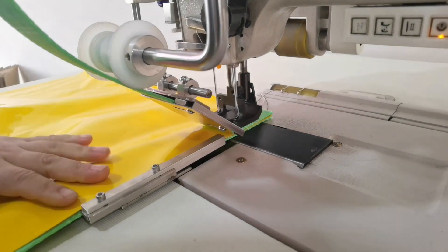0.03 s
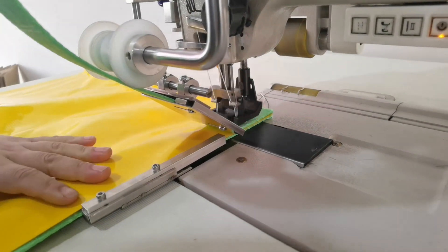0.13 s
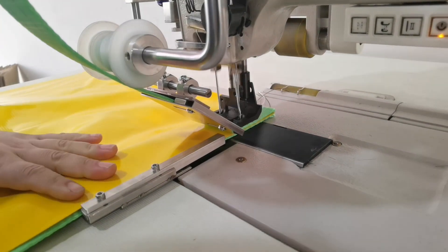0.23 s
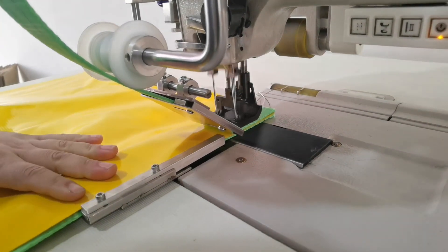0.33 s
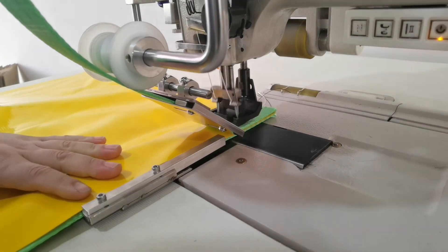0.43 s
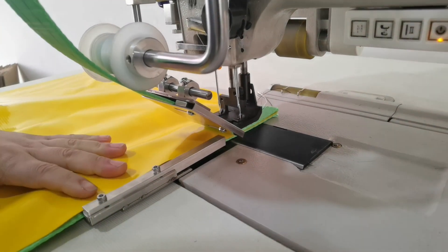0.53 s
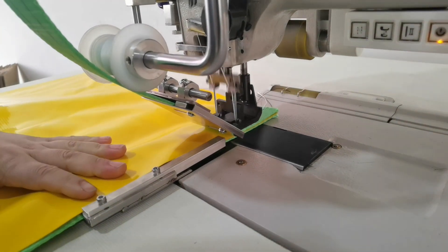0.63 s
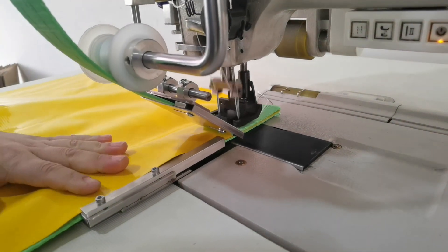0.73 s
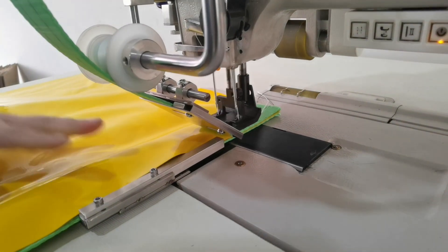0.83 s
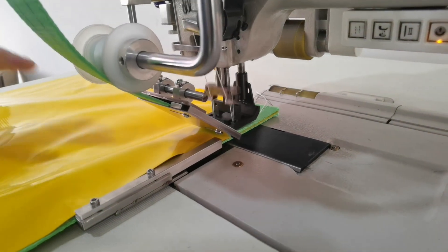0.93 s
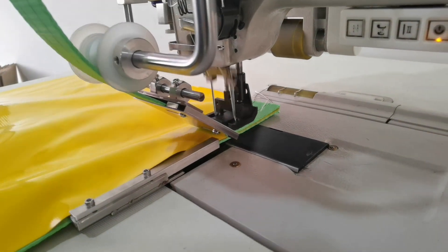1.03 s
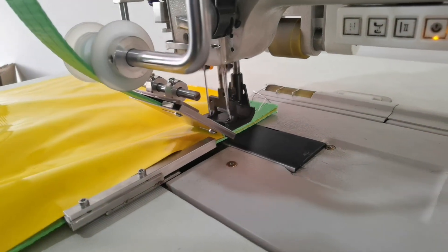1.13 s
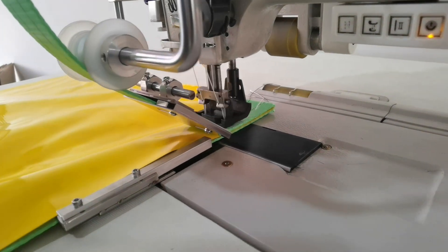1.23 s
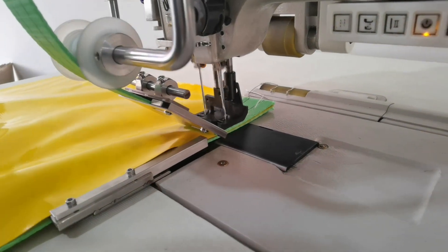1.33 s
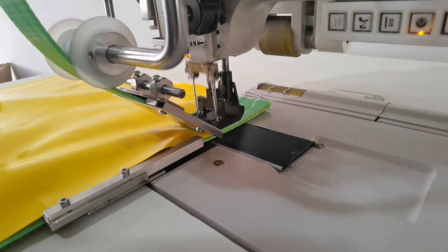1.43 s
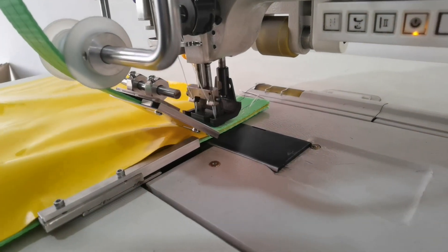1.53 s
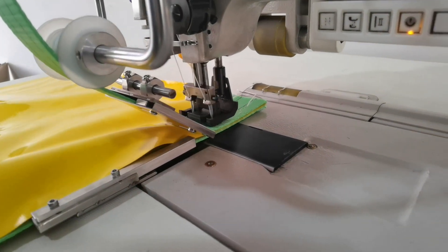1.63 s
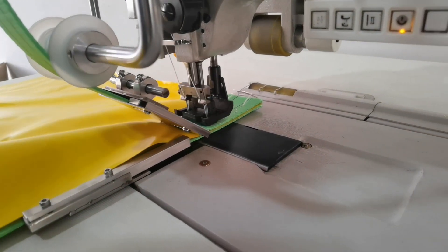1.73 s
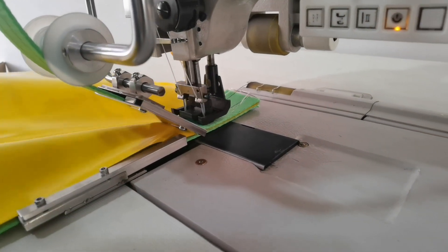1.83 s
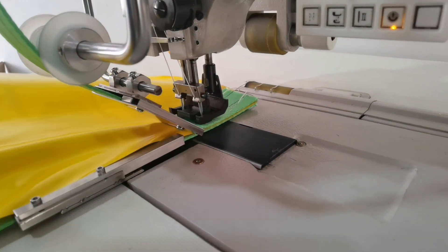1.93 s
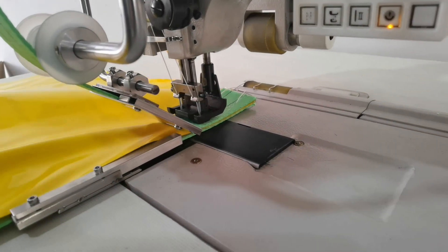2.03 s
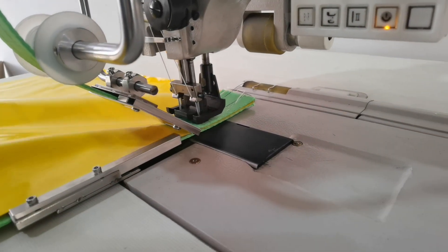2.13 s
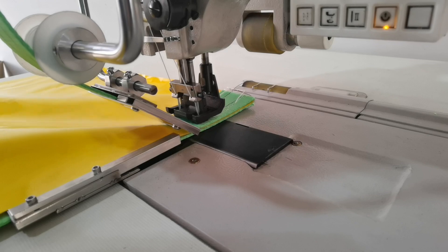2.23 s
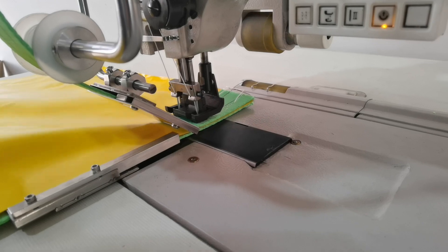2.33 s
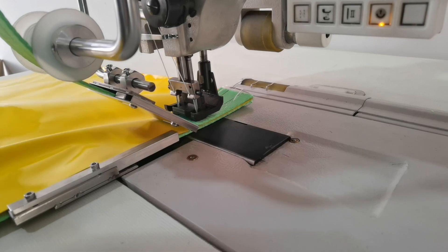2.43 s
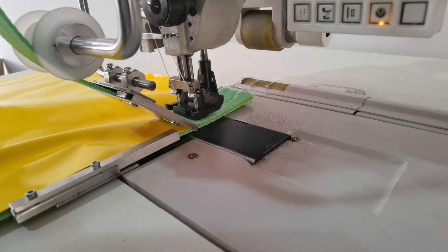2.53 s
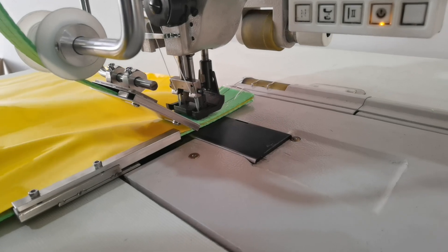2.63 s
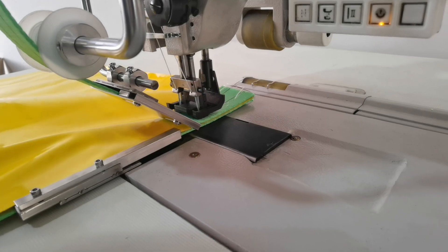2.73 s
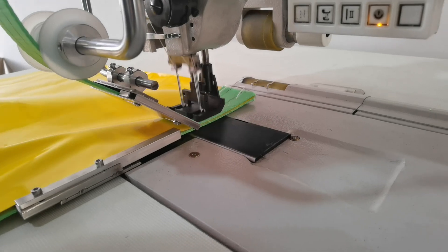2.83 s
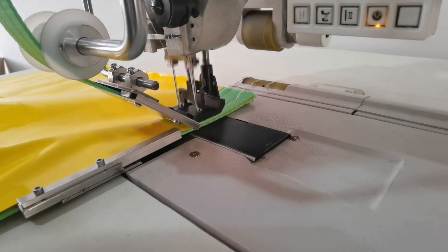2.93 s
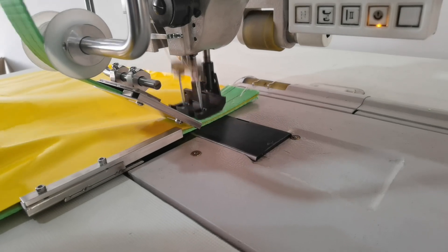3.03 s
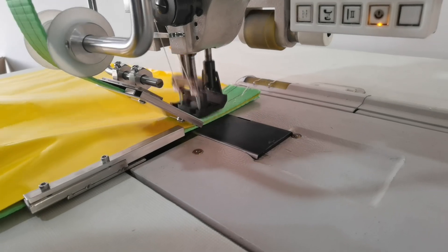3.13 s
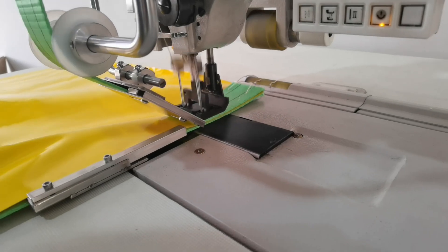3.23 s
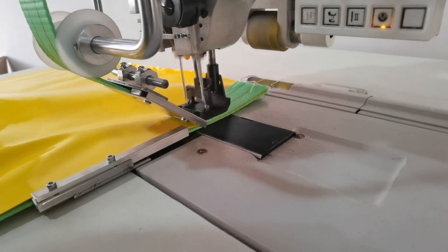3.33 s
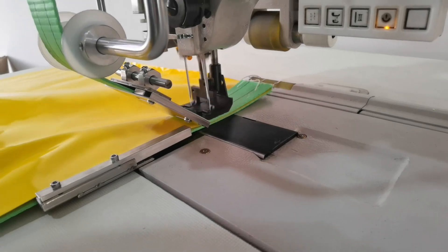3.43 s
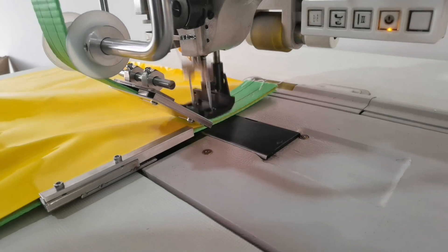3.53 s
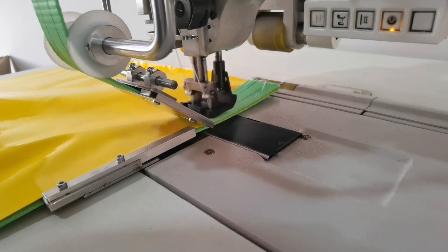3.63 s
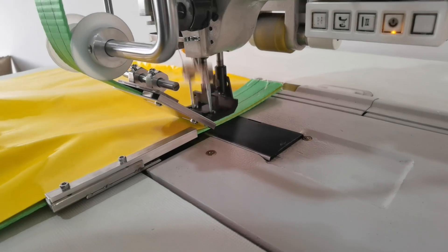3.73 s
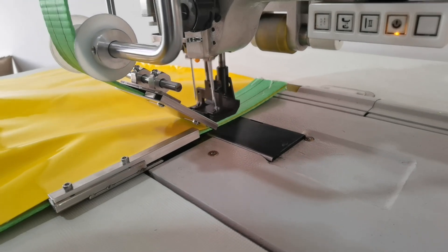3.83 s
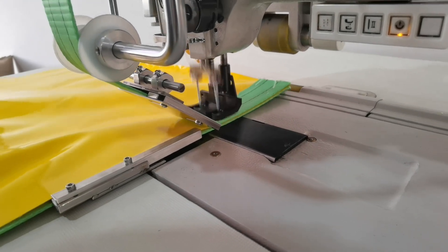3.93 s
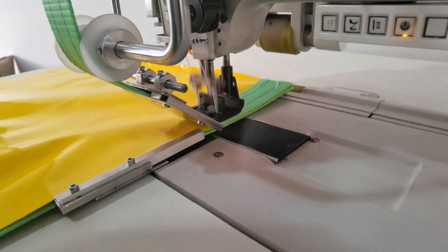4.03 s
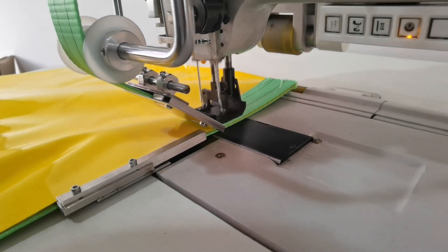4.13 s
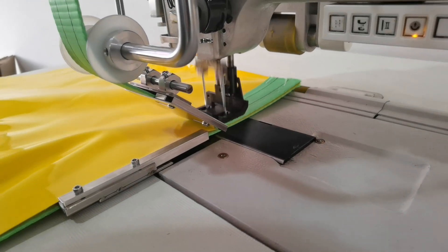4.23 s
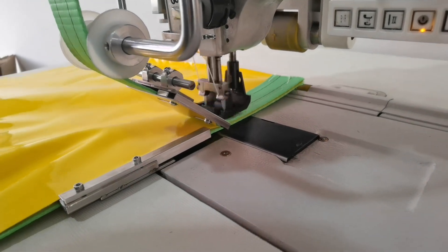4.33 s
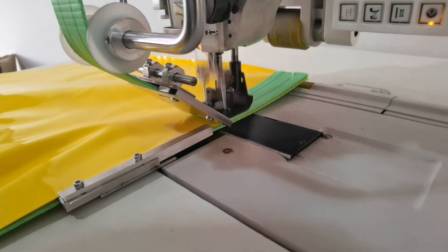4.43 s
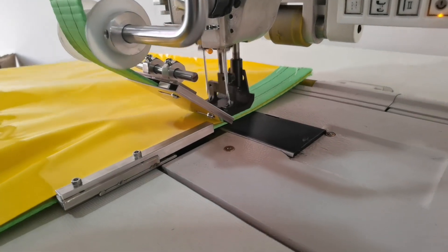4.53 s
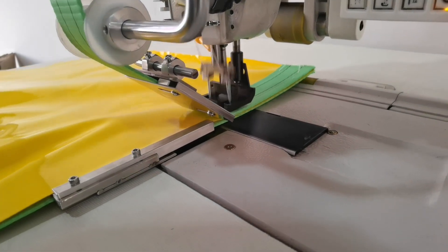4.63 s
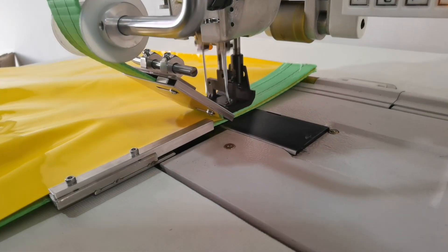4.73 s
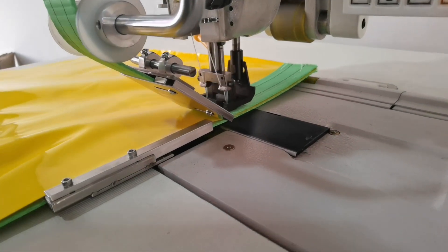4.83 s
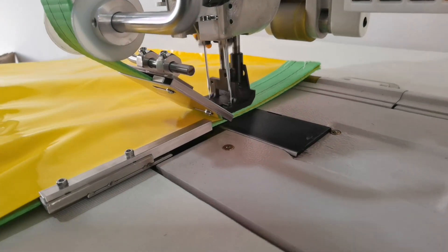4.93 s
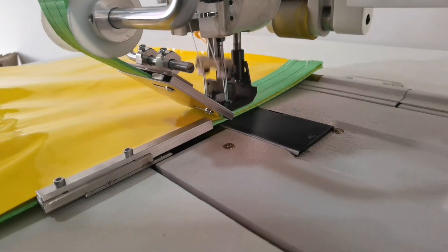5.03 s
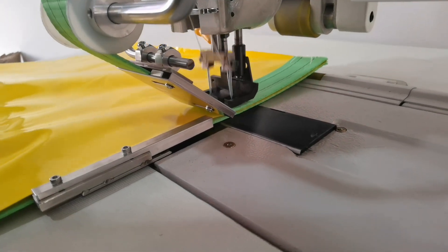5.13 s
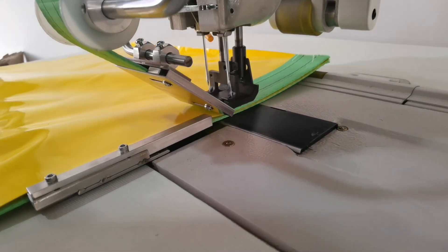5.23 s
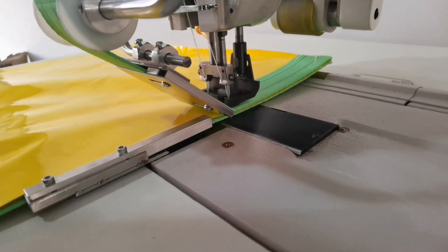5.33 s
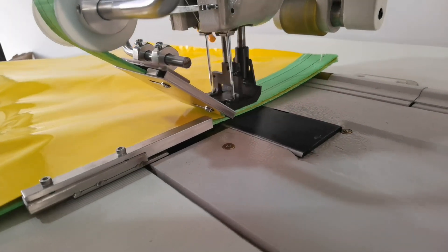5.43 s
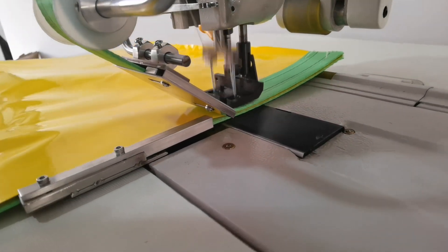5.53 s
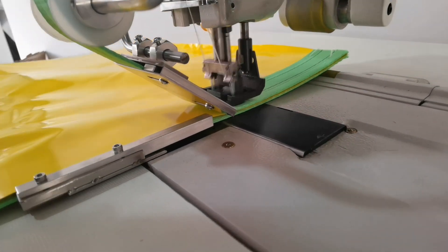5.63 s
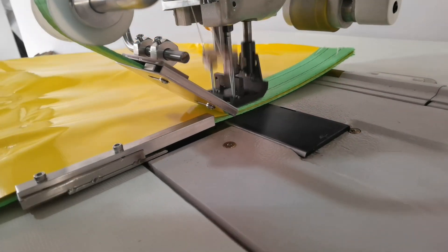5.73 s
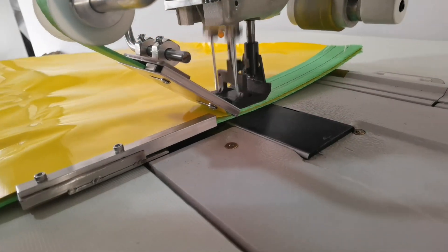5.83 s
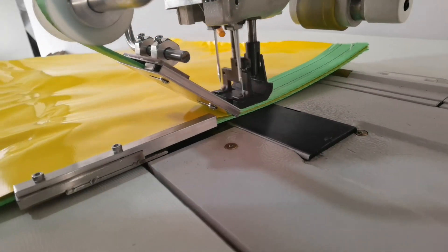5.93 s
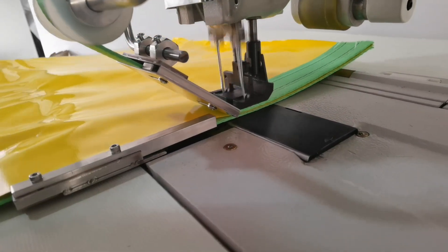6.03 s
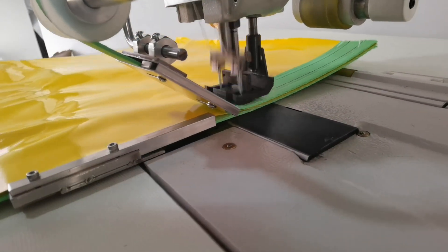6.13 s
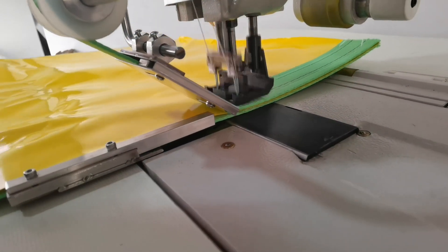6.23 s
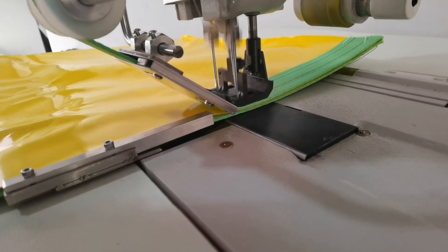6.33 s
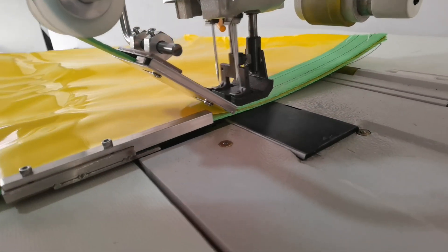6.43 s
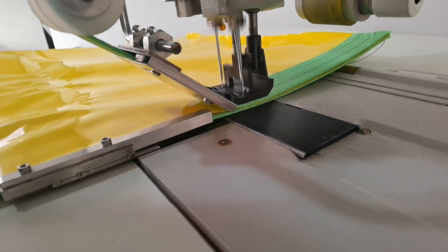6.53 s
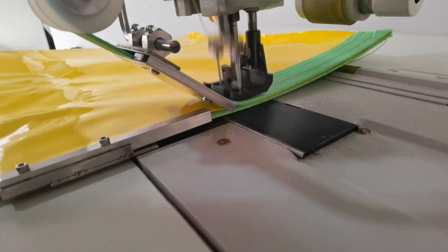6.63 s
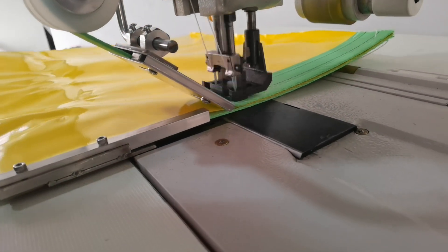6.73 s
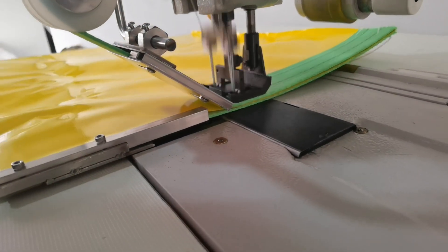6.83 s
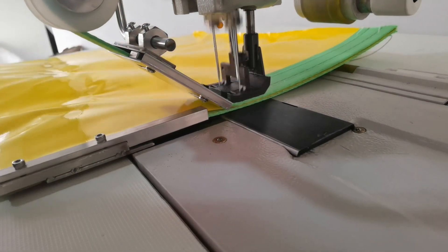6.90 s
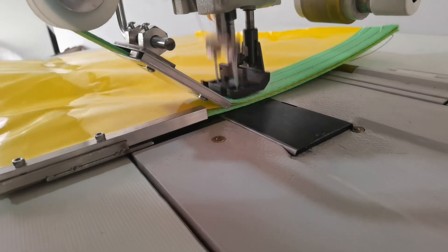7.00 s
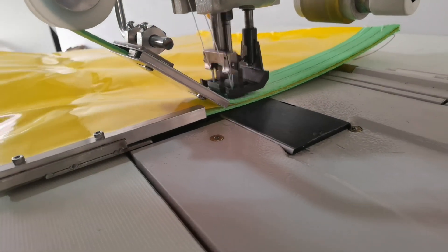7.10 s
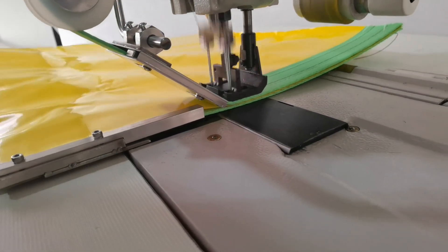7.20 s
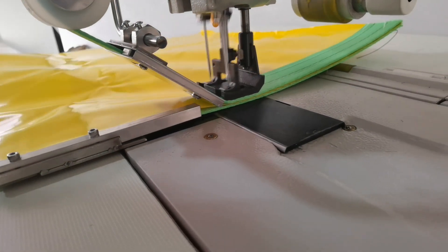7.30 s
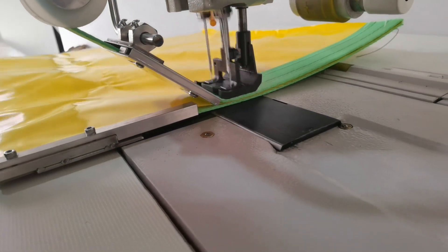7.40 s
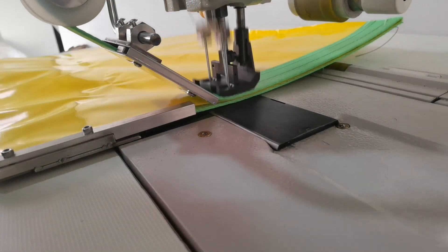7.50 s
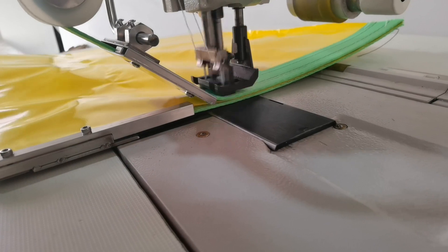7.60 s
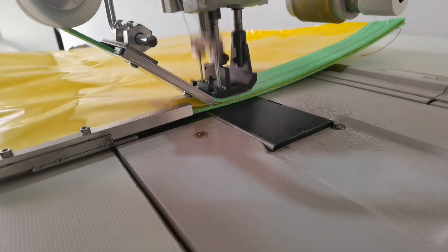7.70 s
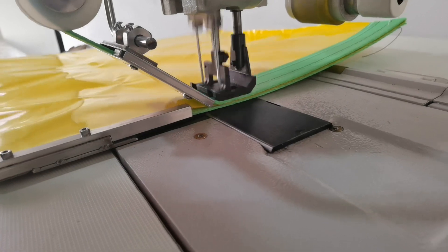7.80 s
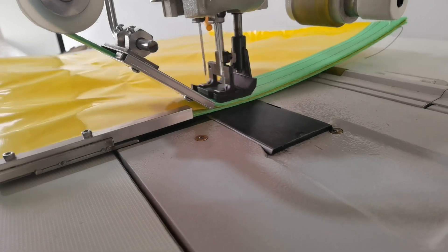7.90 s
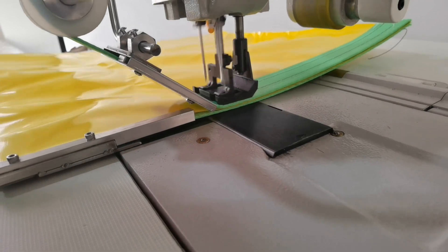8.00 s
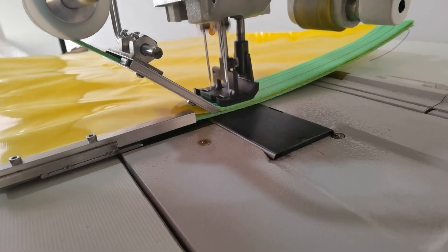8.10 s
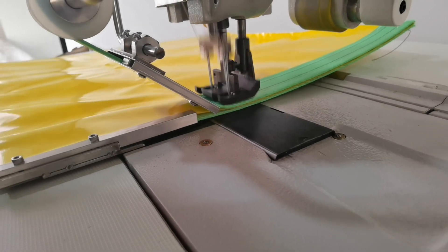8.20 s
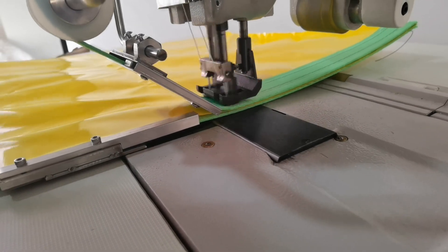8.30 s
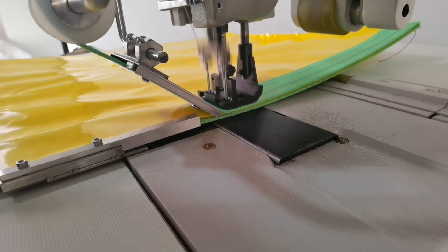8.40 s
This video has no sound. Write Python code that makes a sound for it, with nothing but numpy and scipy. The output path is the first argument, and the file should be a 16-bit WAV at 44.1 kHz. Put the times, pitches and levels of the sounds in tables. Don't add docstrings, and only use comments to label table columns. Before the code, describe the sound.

Close industrial stitching: bright hissing air jet over slow thuds, a jolting stop, quiet workshop hum, then uneven, quickening and finally rapid mechanical pounding.

```python
import sys
import numpy as np
from scipy import signal
from scipy.fft import rfft, irfft, next_fast_len
from scipy.io import wavfile
from scipy.ndimage import uniform_filter1d

SR = 44100
rng = np.random.default_rng(int(sys.argv[2]) if len(sys.argv) > 2 else 0)


def to_linear_factor(level_db):
    exponent = np.asarray(level_db, float) / 20
    return 10 ** exponent


def store_pcm(level_fs):
    pcm = np.round(np.clip(level_fs, -1, 1) * 32767).astype(np.int16)
    wavfile.write(sys.argv[1], SR, np.atleast_2d(pcm).T)


N = 373086
T = np.arange(N) / SR
PEDAL_UP_S, PEDAL_DOWN_S, CLUTCH_S = 1.457, 2.59, 2.68


def unit(x):
    return x / np.sqrt(np.mean(x ** 2) + 1e-20)


def along(points, hz):
    f, v = np.transpose(points)
    return np.interp(np.log(hz + 1), np.log(f + 1), v)


def peaked(peaks, hz, base_db):
    power = to_linear_factor(2 * base_db)
    for center, width, db in peaks:
        power = power + to_linear_factor(2 * db) / (1 + (2 * (hz - center) / width) ** 2)
    return np.sqrt(power)


def wobble(rate):
    knots = int(N * rate // SR + 2)
    return np.interp(T * rate, np.arange(knots), rng.standard_normal(knots))


def hiss(gain, alike, lead=((0, 0), (1, 0))):
    m = next_fast_len(N, True)
    hz = np.fft.rfftfreq(m, 1 / SR)
    shared, *own = rfft(rng.standard_normal((3, m)))
    half = np.exp(-.5j * np.interp(hz, *np.transpose(lead)))
    both = alike ** .5 * shared * [half, 1 / half]
    apart = (1 - alike) ** .5 * np.array(own)
    return unit(irfft(gain(hz) * (both + apart), m)[:, :N])


def impulses(s, db):
    return np.bincount((s * SR).astype(int), to_linear_factor(db), N)[:N]


def struck(blows, modes, flip, spread_db):
    s, db = np.transpose(blows)
    out = np.zeros(N)
    for k, (hz, level_db, t60) in enumerate(modes):
        hits = impulses(s, db + level_db + spread_db * rng.standard_normal(len(s)))
        r, w = to_linear_factor(-60 / t60 / SR), 2 * np.pi * hz / SR
        out += flip ** k * signal.lfilter([0, r * np.sin(w)], [1, -2 * r * np.cos(w), r * r], hits)
    return out


def bursts(blows, t60, gain, alike):
    s, db = np.transpose(blows)
    size = signal.lfilter([1], [1, -to_linear_factor(-60 / t60 / SR)], impulses(s, db))
    return size * hiss(gain, alike, LEAD[2])


# first turn in seconds, turn length in seconds, turns.
SLOW = (.008, .2714, 5)
FAST = (5.530, .12219, 24)
# start in seconds, then thud level and knock level in dB
WANDER = [(1.365, -1, -18), (1.641, -40, -40), (2.6, -27, -18), (2.75, -29, -17), (2.9, -0.5, 2.5),
          (3.058, 2, 3.5), (3.176, 3, 3), (3.298, 2, 4), (3.421, 1, 2), (3.542, 0.5, 2), (3.669, 4, 3),
          (3.808, -8, -2), (3.959, -2, 1), (4.099, -2, -2), (4.241, 0, 3), (4.359, -1.5, 0.5),
          (4.503, 5.5, 4), (4.7, -0.5, -2.5), (4.947, 2, -5.5), (5.219, 3.5, 2), (5.408, -0.5, 1)]


def turns(run):
    return run[0] + run[1] * np.arange(run[2])


def shaft():
    s = np.r_[turns(SLOW), np.transpose(WANDER)[0], turns(FAST), N / SR]
    return 2 * np.pi * np.interp(T, s, np.arange(len(s)))


def repeated(pattern, run, scatter_db):
    share, db = np.transpose(pattern)
    s = (turns(run)[:, None] + share * run[1]).ravel()
    return np.transpose([s, np.tile(db, run[2]) + scatter_db * rng.standard_normal(len(s))])


STILL = 1.56, 2.6


def wandering(slow, fast, column, rebound):
    start = np.r_[np.transpose(WANDER)[0], FAST[0]]
    blows = []
    for row, length in zip(WANDER, np.diff(start)):
        pattern, steady = (slow, SLOW[1]) if length > .17 else (fast, FAST[1])
        for share, db in pattern:
            if not rebound or share * steady < length:
                blows.append((row[0] + share * (steady if rebound else length), db + row[column]))
    return np.array([blow for blow in blows if not STILL[0] < blow[0] < STILL[1]])


def pedal(running_db, fall_db_per_s, start_s, rise_db_per_s, rest_db):
    since_up = T - PEDAL_UP_S
    fall = np.maximum(-fall_db_per_s * since_up, -20 - 124 * since_up)
    ramp = np.maximum(fall, rest_db - running_db + rise_db_per_s * (T - start_s))
    return np.maximum(running_db + np.minimum(ramp, 0), rest_db)


# time in seconds, level in dB.
AIR = [(0, -17), (.15, -16.5), (.9, -18), (1.07, -16), (1.18, -17), (1.32, -15.5), (1.45, -16),
       (2.62, -16.5), (2.69, -14.5), (2.77, -14), (3, -15.5), (4.2, -16.5), (4.45, -15), (5, -17),
       (6.4, -16), (7, -17), (8.46, -16.5)]


def flow(angle):
    fill_db_per_s, spin_up_s, jolt_s = 2200, 0.3, 0.089
    speed = uniform_filter1d(np.gradient(angle) * SR / (2 * np.pi), size=SR // 10)
    octaves = np.log2(np.clip(speed * FAST[1], FAST[1] / SLOW[1], 1))
    since_down = T - PEDAL_DOWN_S
    octaves = octaves - 2.1 * np.clip(1 - since_down / spin_up_s, 0, 1) * (since_down > 0)
    jolt_db = 10 * np.exp(-((T - PEDAL_UP_S - jolt_s / 2) / jolt_s) ** 2)
    air_db = np.interp(T, *np.transpose(AIR))
    clatter_db = -31.5 + 2.5 * octaves + 0.56 * wobble(9)
    motor_db = -32 + 7 * octaves + jolt_db
    return (pedal(air_db, 700, PEDAL_DOWN_S, fill_db_per_s, rest_db=-64),
            pedal(clatter_db, 240, PEDAL_DOWN_S, fill_db_per_s, rest_db=-80.5),
            pedal(motor_db, 62, CLUTCH_S, 300, rest_db=-65.5))


# time in seconds, place from 0 to 2.
VIEW = [
    (0, 0),
    (1.5, 0),
    (2.5, 1),
    (4.3, 1),
    (5.6, 2),
    (8.46, 2),
]
# Hz, width in Hz, level in dB.
GLINT = [
    [(5750, 23, 5.5), (6130, 44, 8), (6500, 340, -1.5), (7450, 97, 5), (7990, 180, 4.5), (8700, 200, -1), (9600, 410, -4), (10800, 100, -29)],
    [(5740, 26, 4.5), (7400, 48, 8.5), (7957, 100, 4), (8400, 83, -6), (9565, 103, 5), (10800, 84, -42)],
    [(6280, 29, 2.5), (6960, 140, -28), (8000, 180, 0.5), (8380, 210, -0.5), (9550, 320, -0.5), (10020, 140, 2), (7880, 68, 2), (9400, 110, 0)],
]
# Hz, lead in radians.
LEAD = [
    [(0, -2), (3880, 0.2), (5680, 5.5), (9730, 24), (10500, 30), (14000, 21), (16100, 30)],
    [(0, -5), (1460, -1), (3620, 11.5), (5940, 18), (6890, 16.5), (8270, 30), (8960, 32.5), (16100, 49)],
    [(0, 0.17), (1460, 2.39), (2410, 0.51), (3530, 5.9), (4910, 7.54), (6460, 14.12), (8010, 20.1), (13800, 18.5), (16100, 24.8)],
]
# Hz, level in dB per Hz.
JET = [(2500, -24), (4000, -10.5), (4900, -6.5), (5600, -3.5), (6400, -1.5), (7000, -0.5), (8000, 0.5),
       (10300, -3.5), (11000, -12), (11600, -35), (12400, -10), (13300, -13), (15500, -9.5), (16500, -15)]


def jet(level_db, angle):
    place = np.interp(T, *np.transpose(VIEW))
    air = 0
    for k, (peaks, lead) in enumerate(zip(GLINT, LEAD)):
        nearness = np.clip(1 - abs(place - k), 0, 1) ** .5
        colour = lambda f: to_linear_factor(along(JET, f)) * peaked(peaks, f, base_db=-4.5)
        air = air + nearness * hiss(colour, alike=0.64, lead=lead)
    chop_db = 0.28 * np.cos(2 * angle - 2.2) + 0.32 * np.cos(angle - 4.5)
    flutter_db = 1.0 * wobble(30) + 1.25 * wobble(300)
    return to_linear_factor(level_db + 2.0 + chop_db + flutter_db) * air * to_linear_factor([[.45], [-.45]])


# Hz, level in dB per Hz.
CLATTER = [(200, -13), (400, -10), (600, -16), (1200, -3.5), (1800, -3.5), (2600, 0.5), (3000, 7.5),
           (3900, -4), (5500, -10.5)]
# Hz, width in Hz, level in dB.
COVER = [(425.5, 14, 11.5), (621, 28, 9.5), (856, 78, 7.5), (1016, 20, 7.5), (1388, 29, 7), (2320, 60, -2)]


def clattering_links(level_db, angle):
    swell_db = 1.7 * np.cos(2 * angle - 1.6) + .8 * np.cos(angle - .6)
    flutter_db = .6 * wobble(60) + 1.2 * wobble(400)
    colour = lambda f: to_linear_factor(along(CLATTER, f)) * peaked(COVER, f, base_db=0.0)
    return to_linear_factor(level_db + 6.0 + swell_db + flutter_db) * hiss(colour, alike=0.54, lead=LEAD[2])


# Hz, level in dB per Hz.
RUMBLE = [(30, -47), (50, 0), (100, -8.5), (130, -7.5), (165, -5.5), (185, -1), (210, 3.5), (250, -2.5),
          (340, -14), (410, -12), (600, -17), (750, -21), (1200, -48)]


def motor(level_db, angle):
    swell_db = 1.8 * wobble(13) + 1.05 * np.sin(angle)
    return to_linear_factor(level_db + 0.5 + swell_db) * hiss(lambda f: to_linear_factor(along(RUMBLE, f)), alike=0.96)


def patchy(x, patchy_db):
    z = signal.stft(x, nperseg=512)[2]
    field = uniform_filter1d(rng.standard_normal(z.shape[1:]), size=3, axis=0)
    field = uniform_filter1d(field, size=40, axis=1)
    return signal.istft(z * to_linear_factor(patchy_db * unit(field)), nperseg=512)[1][:, :N]


# Hz, level in dB per Hz.
SHOP = [(15, -43), (25, -1), (102, -1.5), (1190, -37), (2910, -22.5), (3160, -22), (3720, -29), (4030, -25),
        (7510, -10), (12900, -35), (16000, -36)]


def workshop():
    return to_linear_factor(-53.5 + 2.5 + 1.1 * wobble(6.1)) * hiss(lambda f: to_linear_factor(along(SHOP, f)), alike=0.26)


# share of the turn from 0 to 1, level in dB.
SLOW_THUD = [(0.025, -28), (0.095, -34), (0.237, -28.5), (0.388, -30), (0.455, -32.5), (0.526, -35),
             (0.668, -39), (0.735, -39)]
FAST_THUD = [(0.026, -21), (0.2, -33), (0.347, -31), (0.501, -21.5), (0.669, -26.5)]
# time in seconds, level in dB.
NUDGES = [
    (1.82, -41),
    (1.885, -48),
    (2.37, -52),
    (2.756, -32),
    (2.80, -45),
]
# Hz, level in dB, seconds to die by 60 dB.
TABLE = [(61.5, -1, 0.2), (79.6, 0.5, 0.16)]


def table_thuds():
    thuds = np.r_[repeated(SLOW_THUD, SLOW, scatter_db=1.1),
                  wandering(SLOW_THUD, FAST_THUD, column=1, rebound=True),
                  NUDGES,
                  repeated(FAST_THUD, FAST, scatter_db=.8)]
    return struck(thuds, TABLE, flip=1, spread_db=0.8)


# share of the turn from 0 to 1, level in dB.
SLOW_KNOCK = [(0.067, -32.5), (0.174, -33.5), (0.259, -29.5), (0.381, -34), (0.503, -43), (0.638, -32.5),
              (0.859, -32), (0.996, -29.5)]
FAST_KNOCK = [(0.163, -24), (0.295, -29.5), (0.508, -27), (0.802, -29), (0.958, -24.5)]
# time in seconds, level in dB.
SHUDDER = [
    (1.466, -27),
    (1.488, -38),
    (1.536, -43),
]


def knocks():
    return np.r_[repeated(SLOW_KNOCK, SLOW, scatter_db=1.2),
                 wandering(SLOW_KNOCK, FAST_KNOCK, column=2, rebound=False),
                 SHUDDER,
                 repeated(FAST_KNOCK, FAST, scatter_db=1.1)]


# Hz, level in dB, seconds to die by 60 dB.
FRAME = [(163.2, -1, 0.21), (208, -1, 0.26), (232.7, -10.5, 0.28), (300, -20.5, 0.31), (412.7, -17.5, 0.14)]


def frame(knocked):
    return struck(knocked, FRAME, flip=-1.036, spread_db=2.8)


def shaken_links(knocked):
    shaken = knocked + [0, -3] + [0, 3.5] * rng.standard_normal(knocked.shape)
    colour = lambda f: to_linear_factor(along(CLATTER, f)) * peaked(COVER, f, base_db=-9.0)
    return bursts(shaken, .06, colour, alike=0.42)


# time in seconds, peak level in dB.
CLICKS = [(2.8544, -9), (3.1871, -26), (3.2475, -22), (3.3023, -13), (3.4226, -11.5), (3.4979, -30),
          (3.5892, -29), (3.9489, -26), (4.0661, -18), (4.1165, -26), (4.2347, -13.5), (4.5036, -30),
          (5.2335, -34), (5.3522, -16.5), (5.4215, -24)]
# Hz, level in dB, seconds to die by 60 dB.
HOOK = [(2450, -22, 0.0083), (2910, -5, .02), (3700, 2, 0.0077), (4350, -1, 0.019), (1340, -19, 0.032)]


def hook():
    clicks = np.r_[repeated([(.07, -30), (.6, -36)], FAST, scatter_db=3),
                   repeated([(.05, -36), (.5, -38)], SLOW, scatter_db=3),
                   CLICKS]
    rattle = np.r_[clicks, clicks + [.003, -3], clicks + [.007, -5]]
    return to_linear_factor(-6) * struck(rattle, HOOK, flip=-1, spread_db=2.5)


# Hz, level in dB, seconds to die by 60 dB.
HOUSING = [(310, -2, 0.16), (250, 5, 0.07), (433, 5.5, 0.03), (553, -4, 0.081)]


def rundown():
    s = rng.uniform(1.42, 1.83, size=45)
    return struck(np.transpose([s, -41 - 38 * (s - 1.42)]), HOUSING, flip=-1.15, spread_db=0.5)


# time in seconds, level in dB.
BRAKE = [
    (1.472, -21.5),
    (1.53, -29.5),
    (1.60, -43),
]
# time in seconds, level in dB.
SETTLE = [
    (1.755, -42.5),
    (1.82, -46),
    (1.885, -49),
    (2.37, -62),
]
# Hz, level in dB, seconds to die by 60 dB.
ARM = [(126, 2.5, 0.31), (70.6, -9, 0.51), (192, -7, 0.25), (324, -9.5, 0.37), (463, -4, 0.18),
       (594, -6, 0.18)]


def brake():
    braked = struck(BRAKE, ARM, flip=0.76, spread_db=6.0)
    return braked + struck(SETTLE, ARM[:3], flip=0.89, spread_db=4.5)


# time in seconds, level in dB.
PUFFS = [
    (1.535, -35),
    (1.992, -56),
]


def valve_puffs():
    bright = bursts(PUFFS[:1], 0.057, lambda f: to_linear_factor(along(JET, f)), alike=.6)
    dull = bursts(PUFFS[1:], .08, lambda f: (f > 250) / (1 + (f / 1300) ** 4), alike=.6)
    return bright + dull


# time in seconds, level in dB.
VALVE = [
    (1.992, -54),
    (2.601, -39),
    (2.625, -49),
    (2.655, -41),
]


def valve():
    return struck(VALVE, HOUSING, flip=-0.85, spread_db=1.5)


# Hz, level in dB per Hz.
SNAP = [(300, -27), (1200, -5), (2000, 1), (4500, 0), (6000, -6), (12000, -16), (16000, -20)]


def contact_cracks():
    return to_linear_factor(-6) * bursts(CLICKS, 0.059, lambda f: to_linear_factor(along(SNAP, f)), alike=.6)


# Hz, seconds to die by 60 dB.
ROOM = [(100, 0.66), (500, 0.66), (2000, 0.15), (8000, 0.11)]


def room(x):
    hz, t, z = signal.stft(rng.standard_normal((2, SR // 2)), SR, nperseg=256)
    tail = signal.istft(z * to_linear_factor(-60 * t / along(ROOM, hz)[:, None]), SR, nperseg=256)[1]
    return signal.fftconvolve(x[None], tail / np.linalg.norm(tail[0]), axes=1)[:, :N]


# Hz, margin in spreads.
MARGIN = [
    [(1000, 6), (2800, 1.3), (3200, -.9), (3600, 0), (3950, -.9), (4950, 0), (5400, 2.3), (6000, 6)],
    [ (10300, 3.5), (10800, .6), (11250, -1.7), (11750, -2.2), (12300, -1), (13250, -1.2), (14500, -.4), (15900, -2.2)],
]
# from and to in seconds, Hz, width in Hz, lift in
SPELLS = [(-1, 2, 12300, 500, 2.5), (5.6, 9, 12300, 500, 1.8), (-1, 4.4, 14600, 600, 1.4),
          (4.45, 5.6, 15400, 600, 3), (5.7, 6.1, 14500, 1500, -1.5), (5.6, 9, 11100, 600, 1.1),
          (-1, 2, 3600, 250, .8), (4.4, 5.6, 4200, 400, -.6), (5.6, 9, 4350, 250, .9),
          (5.6, 9, 3200, 200, -.5)]


def dropping_out(x):
    window = signal.windows.cosine(2048)
    hz, t, z = signal.stft([x[0] + x[1], x[0] - x[1]], SR, window, 2048)
    band = np.where(hz < 5500, hz // 172, 17 + hz // 345).astype(int)
    luck = unit(uniform_filter1d(rng.standard_normal((3, band.max() + 1, len(t))), size=3))
    luck = (.6 * luck[0] + .8 * luck[1:])[:, band]
    margin = np.interp(hz, *np.vstack(MARGIN).T)[:, None]
    for from_s, to_s, center, width, lift in SPELLS:
        bump = np.exp(-((hz - center) / width) ** 2)
        margin = margin + lift * np.outer(bump, (t > from_s) & (t < to_s))
    level_db = 10 * np.log10(np.sum(abs(z[:, (hz > 2000) & (hz < 5000)]) ** 2, (0, 1)) + 1e-20)
    clack_db = np.clip(level_db - signal.medfilt(level_db, 9) - 1, -.5, 6)
    margin = margin + .35 * np.outer(hz < 6000, clack_db)
    total = np.array([np.bincount(band, column) for column in margin.T]).T
    margin = total[band] / np.bincount(band)[band, None]
    power = np.sum(abs(z) ** 2, (0, 1))
    loud = power > power.max() * to_linear_factor(-30)
    heard = ((luck < margin) | ~loud) * (hz < 16150)[:, None]
    mid, side = signal.istft(z * heard, SR, window, 2048)[1][:, :N] / 2
    return np.array([mid + side, mid - side])


def scene():
    angle, knocked = shaft(), knocks()
    jet_db, clatter_db, motor_db = flow(angle)
    running = jet(jet_db, angle) + clattering_links(clatter_db, angle) + motor(motor_db, angle)
    low = table_thuds() + frame(knocked) + rundown() + brake() + valve()
    clicks = hook()
    near = low * to_linear_factor([[-1.1], [1.1]])
    near = near + np.array([clicks, np.roll(clicks, 8)])
    near = near + shaken_links(knocked) + valve_puffs() + contact_cracks()
    answer = room(to_linear_factor(-21.0) * low + to_linear_factor(-9) * clicks)
    return near + answer + patchy(running, patchy_db=1.5) + workshop()


def roll_off(x):
    return signal.sosfilt(signal.butter(12, 16530, fs=SR, output="sos"), x)


def record(dry):
    cut = signal.sosfilt(signal.butter(6, 40, "highpass", fs=SR, output="sos"), dry)
    soft = cut / (1 + abs(cut / 0.82) ** 6) ** (1 / 6)
    return roll_off(dropping_out(soft))


dry = scene()
out = record(dry)
store_pcm(out)
```